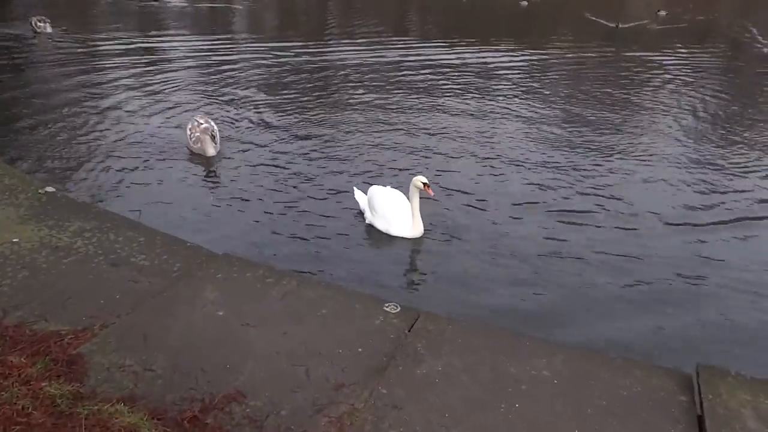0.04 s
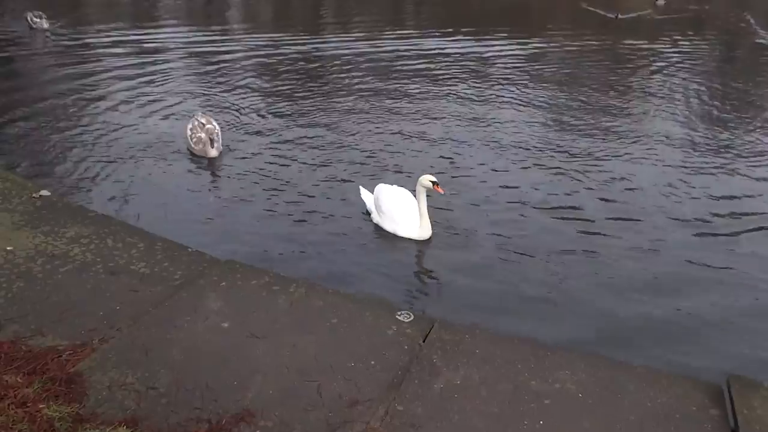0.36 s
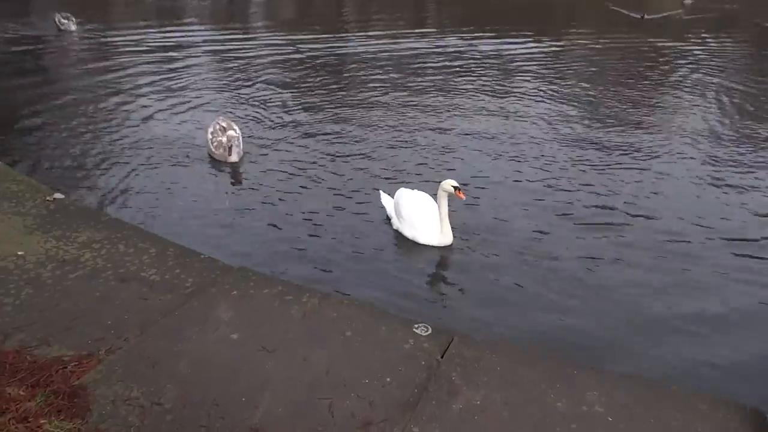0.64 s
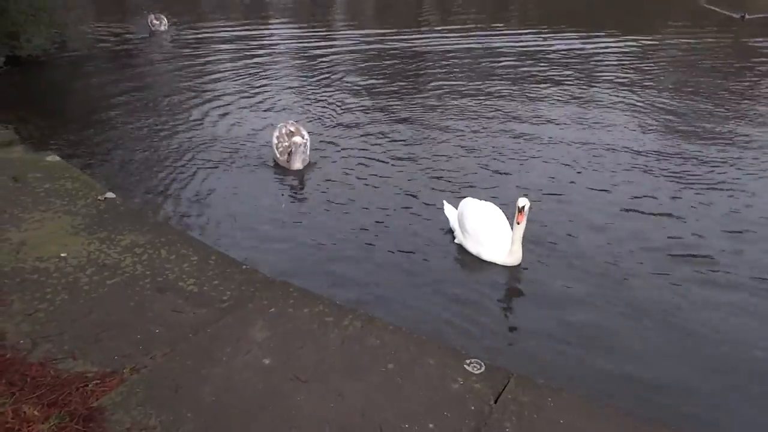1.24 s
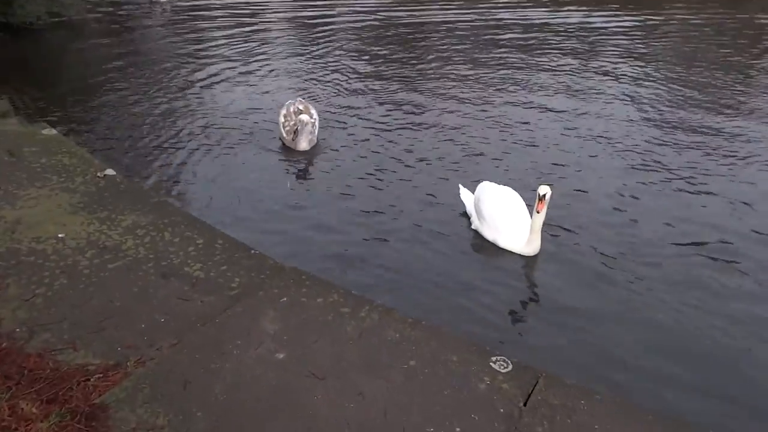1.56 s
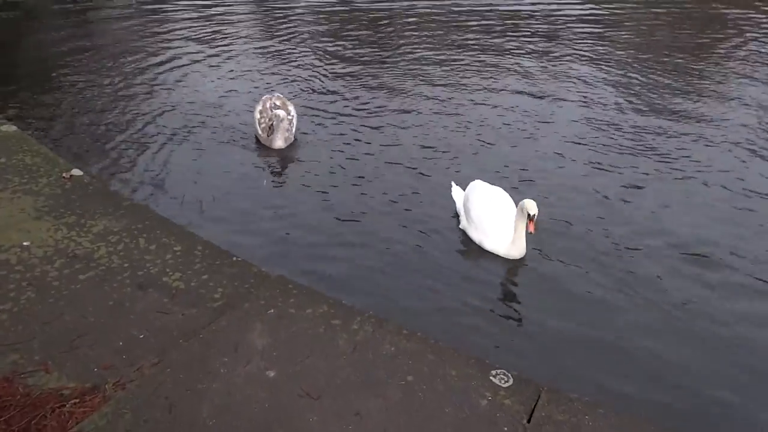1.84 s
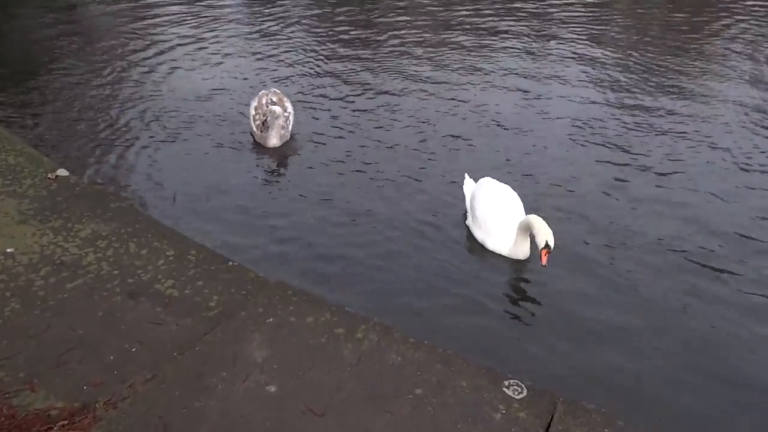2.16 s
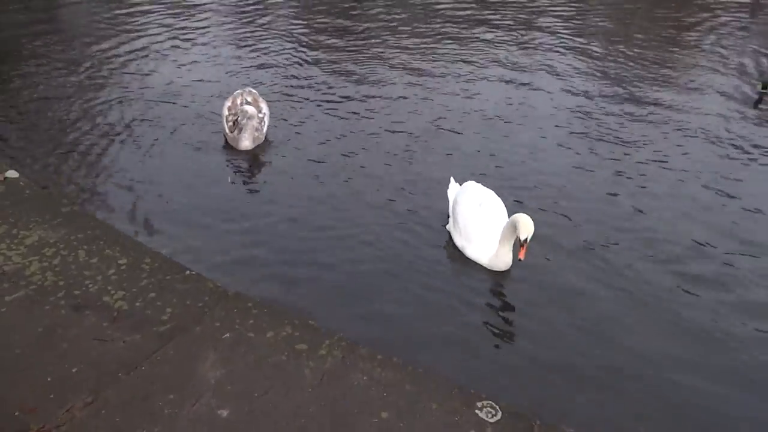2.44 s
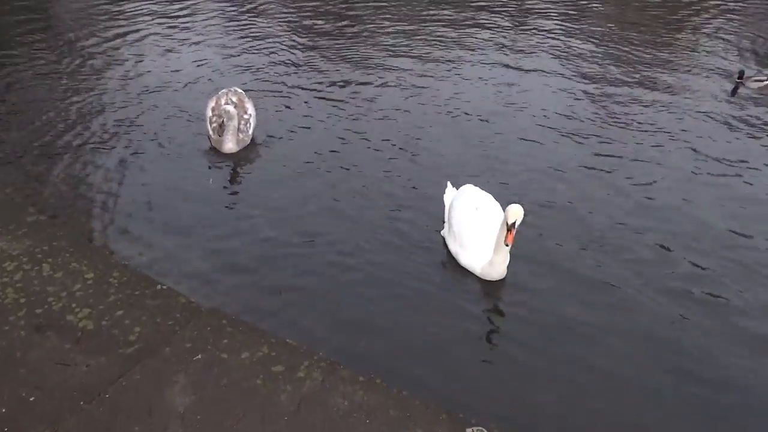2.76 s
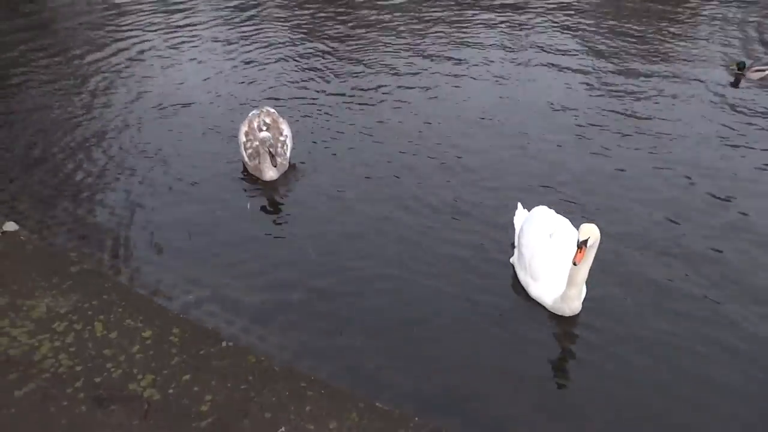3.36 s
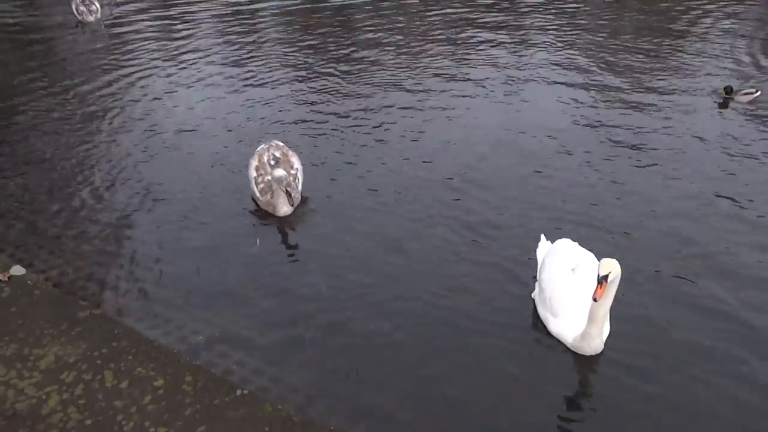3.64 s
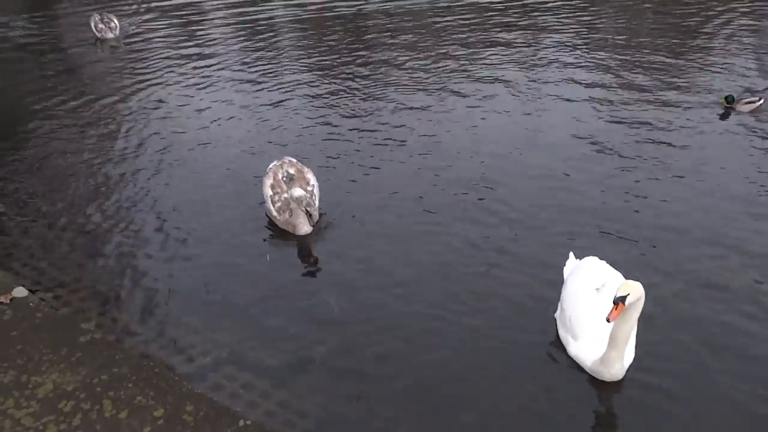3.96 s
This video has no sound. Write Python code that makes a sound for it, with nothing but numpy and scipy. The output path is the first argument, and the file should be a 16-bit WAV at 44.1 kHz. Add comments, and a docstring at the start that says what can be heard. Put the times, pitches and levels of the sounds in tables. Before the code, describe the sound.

Rapid duck-like calls and one drawn-out quack, with faint peeps over a low rumble.

```python
"""A park pond, in stereo. Close to the microphone a water bird chatters in short hoots, eight a second,
draws out one long reedy call, then chatters on. Its voice is a buzz near 300 Hz whose fourth harmonic
rings far above the rest. Farther off come arched whistled peeps, pulsing duck rattles and soft grunts.
The water drips, plops and laps over a low distant rumble, and the banks scatter a faint echo."""
import sys
import numpy as np
from scipy import signal
from scipy.fft import rfft, irfft
from scipy.io import wavfile

SR = 44100
rng = np.random.default_rng(int(sys.argv[2]) if len(sys.argv) > 2 else 0)


def to_wav(s):
    """Save 16-bit WAV."""
    ch = np.atleast_2d(s).T  # columns
    pcm = np.round(np.clip(ch, -1, 1) * 32767)  # PCM
    wavfile.write(sys.argv[1], SR, pcm.astype(np.int16))


N = 176400
T = np.arange(N) / SR

# distant rumble: (frequency [Hz], level [dB])
RUMBLE_SPECTRUM = [(30, -5), (45, -0.5), (70, 4), (280, -10), (1030, -12), (2330, -21.5), (3320, -28),
                   (6600, -35.5), (11000, -40.5)]
# how alike the rumble is left and right: (frequency [Hz], correlation [0-1])
RUMBLE_LIKENESS = [(60, 1), (250, 0.97), (1000, 0.87), (9000, 0.2)]
# the near bird's hoots: (start [s], length [s], level [dB], ring pitch at the middle [Hz], onset [name])
HOOTS = [(.018, 0.065, -14, 1189, "slow"), (.163, 0.029, -17.5, 1188, "soft"),
         (.255, 0.056, -15, 1173, "soft"), (.404, 0.036, -15.5, 1180, "soft"),
         (.518, 0.047, -14, 1182, "hard"), (.655, 0.034, -15.5, 1176, "soft"),
         (.771, 0.04, -12.5, 1186, "hard"), (.893, 0.044, -13, 1172, "hard"),
         (1.032, .022, -13.5, 1179, "soft"), (1.145, 0.033, -11.5, 1178, "hard"),
         (1.272, 0.037, -15.5, 1168, "soft"), (1.402, 0.03, -16.5, 1158, "hard"),
         (1.519, 0.016, -25.5, 1158, "hard"), (2.738, 0.042, -18, 1161, "hard"),
         (2.876, 0.035, -18, 1174, "soft"), (2.987, .034, -18, 1195, "slow"),
         (3.091, .045, -15, 1163, "soft"), (3.228, 0.04, -16, 1161, "hard"),
         (3.351, 0.037, -17, 1141, "soft"), (3.469, 0.042, -17, 1132, "hard"),
         (3.597, .039, -13.5, 1161, "soft"), (3.738, 0.031, -15.5, 1147, "soft"),
         (3.878, .02, -19, 1159, "soft"), (3.982, 0.03, -18.5, 1154, "hard")]
# how fast a hoot opens: (onset [name], attack [s])
HOOT_ATTACK_S = {"hard": .009, "soft": 0.011, "slow": .085}
# faint hums between hoots: (start [s], end [s], level [dB], first ring pitch [Hz], last ring pitch [Hz])
HUMS = [(0.101, 0.164, -39.5, 1246, 1256), (0.193, 0.26, -33, 1141, 1153)]
# throat colour of the hoots, for overtones, rasp and late hoarseness: (frequency [Hz], level [dB])
HOOT_OVERTONES = [(1250, -31.5), (1480, -22), (1780, -35.5), (2080, -39), (2370, -25), (2680, -28.5),
                  (3000, -42), (3600, -58), (6800, -62), (7420, -38.5), (8100, -64)]
HOOT_RASP = [(1000, -14.5), (1400, 5), (1900, 5.5), (2700, -8.5), (3200, -23), (4500, -31.5), (6900, -33.5),
             (7450, -6.5), (8100, -28), (10700, -29)]
HOARSE_RASP = [(2100, -6), (2850, 7.5), (3400, -16), (5000, 9), (5900, -26.5)]
# ducks farther off: (start [s], length [s], level [dB], resonance [Hz])
RATTLES = [(0.346, 0.1, -39, 2290), (0.944, 0.097, -39.5, 2330), (1.199, 0.068, -38.5, 2310),
           (1.482, 0.161, -38, 2210), (1.892, 0.068, -37, 2360), (2.143, 0.038, -36.5, 2170),
           (2.46, 0.11, -39.5, 2210), (2.731, 0.041, -37, 2150), (3.05, 0.099, -38.5, 2150),
           (3.181, 0.016, -40.5, 2790), (3.298, 0.05, -38.5, 2140), (3.618, 0.07, -36.5, 2110),
           (3.719, 0.032, -38.5, 2829), (3.866, 0.051, -37, 2350)]
# a duck's throat: (frequency [multiple of the resonance], level [dB])
RATTLE_THROAT = [(0.4, -29), (0.651, -12.5), (.8, 5.5), (1.05, 5), (1.5, -14), (2.1, -28), (2.7, -17),
                 (3.598, -35.5)]
# far peeps: (time of the top [s], top pitch [Hz], kind [name])
PEEPS = [(0.504, 2616, "short"), (0.626, 2693, "short"), (0.759, 2882, "short"), (.875, 2805, "short"),
         (1.128, 2875, "short"), (1.25, 2775, "short"), (1.382, 2600, "short"), (1.649, 2492, "short"),
         (1.796, 2300, "short"), (2.111, 2370, "short"), (2.25, 2484, "sliding"), (2.38, 2840, "short"),
         (2.656, 2494, "sliding"), (2.795, 2600, "sliding"), (2.931, 2456, "sliding"),
         (3.075, 2357, "short"), (3.225, 2380, "short"), (3.358, 2393, "short"), (3.489, 2645, "sliding"),
         (3.738, 2935, "sliding")]
# kinds of peep, by name: (level before strain [dB], arch depth [Hz], fade [s])
PEEP_KINDS = {"short": (-41, 1400, 0.036), "sliding": (-40.5, 1500, 0.048)}
# far grunts: (middle [s])
GRUNT_TIMES = [.572, .827, 1.326, 1.59, 1.715, 2.452, 2.588, 2.866, 3.006, 3.56, 3.688]
# tiny splashes: (time [s], level [dB])
DRIPS = [(1.505, -38), (1.588, -37)]
# melody of the long call: (time [s], ring pitch [Hz])
LONG_PITCH = [(1.95, 844.6), (1.968, 864), (2.014, 1113), (2.054, 1174), (2.118, 1231), (2.24, 1207),
              (2.3, 1244), (2.368, 1226), (2.376, 1179), (2.5, 1153), (2.53, 1111), (2.615, 1124),
              (2.645, 1166)]
# loudness of the long call: (time [s], ring level [dB], gain of overtones, bray and rasp [dB])
LONG_LEVELS = [(1.944, -70.5, -75), (1.956, -29.5, -48), (1.99, -28.5, -42.5), (2.019, -24, -40),
               (2.12, -16.5, -34.5), (2.135, -20.5, -36.5), (2.22, -21, -36), (2.275, -24.5, -40.5),
               (2.365, -21.5, -34), (2.382, -27, -38), (2.43, -26, -40.5), (2.458, -32, -48.5),
               (2.521, -26.5, -41), (2.56, -41, -63), (2.59, -30.5, -54.5), (2.634, -21, -37),
               (2.659, -28, -57.5), (2.695, -53, -65)]
# throat colour of the long call, for overtones, rasp and opening bray: (frequency [Hz], level [dB])
LONG_OVERTONES = [(1100, 3.5), (1520, 0), (1850, -28), (2450, -19), (3100, -18.5), (3800, -11),
                  (5200, -16.5), (5550, -30), (6700, -27), (7350, -16), (7750, -30), (8100, -45.5)]
LONG_RASP = [(600, -18.5), (1400, 3), (2200, -1.5), (2900, -14.5), (3900, -8), (5100, -5.5), (5600, -21),
             (6700, -19.5), (7450, -2), (8100, -39), (10500, -31)]
BRAY_SPECTRUM = [(1900, 12), (2700, -15), (3350, 5.5), (4500, 2)]
# lapping water: (frequency [Hz], level [dB])
LAP_SPECTRUM = [(80, -29), (170, -6), (450, -6), (6000, -40)]


def from_db(db):
    """Decibels to gain."""
    return 10 ** (np.asarray(db) / 20)


def unit_rms(x):
    """Scale to unit level."""
    return x / np.sqrt(np.mean(x ** 2) + 1e-20)


def at_hz(points, hz):
    """Read a spectrum on a log-frequency axis."""
    freqs, values = np.transpose(points)
    return np.interp(np.log(np.maximum(hz, 1)), np.log(freqs), values)


def noise(spectrum):
    """Coloured noise of unit level."""
    gain = from_db(at_hz(spectrum, np.fft.rfftfreq(N, 1 / SR)))
    return unit_rms(irfft(rfft(rng.standard_normal(N)) * gain, N))


def drift(rate_hz):
    """Random wander of spread 1, mostly slower than rate_hz."""
    rolloff = 1 + (np.fft.rfftfreq(N, 1 / SR) / rate_hz) ** 2
    return unit_rms(irfft(rfft(rng.standard_normal(N)) / rolloff, N))


def phase_of(hz):
    """Running phase of a pitch."""
    return 2 * np.pi * np.cumsum(hz) / SR


def ramp(u):
    """Smooth step from 0 to 1."""
    return np.sin(np.pi / 2 * np.clip(u, 0, 1)) ** 2


def bell(t, width):
    """Smooth swell around t = 0."""
    return np.exp(-np.minimum((t / width) ** 2, 100))


def pan(x, left_db):
    """Place a sound across the microphone; negative is to the right."""
    return x * from_db([[left_db / 2], [-left_db / 2]])


def distant_rumble(rumble_db=-39, drone_hz=50.8, drone_db=-46):
    """Rumble from far off, wider towards the treble, with a wavering low drone in the centre."""
    alike = np.clip(at_hz(RUMBLE_LIKENESS, np.fft.rfftfreq(N, 1 / SR)), 0, 1)
    mid = irfft(rfft(noise(RUMBLE_SPECTRUM)) * np.sqrt((1 + alike) / 2), N)
    side = irfft(rfft(noise(RUMBLE_SPECTRUM)) * np.sqrt((1 - alike) / 2), N)
    drone_gain = np.sqrt(2) * from_db(drone_db + 2 * drift(rate_hz=4))
    drone = drone_gain * np.sin(phase_of(drone_hz * (1 + .03 * drift(rate_hz=13))))
    return from_db(rumble_db) * (mid + side * [[1], [-1]]) + drone


def voice(ring_hz, overtones, rasp_spectrum, jitter, flutter_db=2, colour_db=2, shimmer_db=.7):
    """The near bird's buzz: ringing fourth harmonic, fluttering overtones, rasp puffed once a cycle."""
    ring_hz = ring_hz * (1 + jitter * drift(rate_hz=144))
    phase = phase_of(ring_hz) / 4
    wander_db = flutter_db * drift(rate_hz=90) + colour_db * drift(rate_hz=5.3)
    upper = np.zeros(N)
    for k in range(5, 29):
        db = at_hz(overtones, k * ring_hz / 4) + np.roll(wander_db, rng.integers(N))
        upper += np.sqrt(2) * from_db(db) * np.sin(k * phase + rng.uniform(0, 2 * np.pi))
    ring = np.sqrt(2) * np.sin(4 * phase) * from_db(shimmer_db * drift(rate_hz=33))
    rasp = unit_rms(noise(rasp_spectrum) * (1 + .66 * np.cos(phase)))
    return ring, upper, rasp


def chatter(rasp_db=-20.5, hoarse_db=-35, hoarse_build_s=.95):
    """Close by, each hoot opens, sags in level and pitch, and leaves a faint tail."""
    swell_s, swell_db, tail_s, tail_db = .015, -18.5, .021, -20.5
    release_s, lag_s, sag_db, hum_fade_s = .027, .01, .5, .01
    hz, body, faint = np.full(N, float(HOOTS[0][3])), np.zeros(N), np.zeros(N)
    for start, length, db, pitch, onset in HOOTS:
        span = (T > start - 3 * swell_s) & (T < start + length + 4 * tail_s)
        t = T[span] - start
        progress = np.clip(t / length, 0, 1)
        fall_hz = 96.2 * (1 - length / .064)  # shorter hoots fall farther
        lead_in_hz = 35 * ramp(-t / swell_s)
        tail_drop_hz = 24.15 * ramp((t - length) / tail_s)
        hz[span] = pitch + lead_in_hz + fall_hz * (.5 - progress) - tail_drop_hz
        gate = ramp(.5 + t / HOOT_ATTACK_S[onset]) * ramp((length + lag_s - t) / release_s)
        body[span] += gate * from_db(db - sag_db * (.22 + progress))
        faint[span] += from_db(db + tail_db) * bell(t - length, tail_s)
        if onset == "soft":
            faint[span] += from_db(db + swell_db) * bell(t, swell_s)
    for start, end, db, first_hz, last_hz in HUMS:  # the same voice hums on between hoots
        hum = from_db(db) * ramp((T - start) / hum_fade_s) * ramp((end - T) / hum_fade_s)
        hum_share = hum / (hum + body + 1e-20)
        hz += hum_share * (np.interp(T, [start, end], [first_hz, last_hz]) - hz)
        faint += hum
    ring, upper, rasp = voice(hz, HOOT_OVERTONES, HOOT_RASP, jitter=.003)
    after_long_call = ramp((T - LONG_PITCH[-1][0]) / hoarse_build_s)
    hoarseness = from_db(hoarse_db) * after_long_call * noise(HOARSE_RASP)
    return ring * (body + faint) + body * (upper + from_db(rasp_db) * rasp + hoarseness)


def duck_rattles(pulse_hz=95, decay_s=.0035, pad_s=.011):
    """Farther off, separate throat pulses puff into a broad resonance; each run swells and tapers."""
    out = np.zeros(N)
    for start, length, db, resonance_hz in RATTLES:
        span = (T > start - pad_s) & (T < start + length + pad_s)
        t = T[span] - T[span][0]
        rate = pulse_hz * (1 + .1 * rng.standard_normal())
        since_pulse = (t * rate % 1) / rate
        puffs = np.exp(-since_pulse / decay_s) * rng.choice([-1, 1], len(t))
        throat = [(ratio * resonance_hz, level) for ratio, level in RATTLE_THROAT]
        gain = from_db(at_hz(throat, np.fft.rfftfreq(len(t), 1 / SR)))
        rattle = irfft(rfft(puffs) * gain, len(t))
        out[span] += from_db(db) * unit_rms(rattle * np.sin(np.pi * t / t[-1]))
    return out


def peeps(half_depth_s=.047, lag_s=.0031, octave_db=-17, strain_db=-2, flutter_db=3):
    """Far whistles arch up and down with a weak octave; the higher ones are strained and blurred."""
    out, waver = np.zeros(N), .03 * drift(rate_hz=400)
    tops = [top_hz for _, top_hz, _ in PEEPS]
    for time, top_hz, kind in PEEPS:
        db, depth_hz, fade_s = PEEP_KINDS[kind]
        span = abs(T - time) < 2 * fade_s
        t = T[span] - time
        strain = (top_hz - min(tops)) / np.ptp(tops)
        arch_hz = top_hz - depth_hz * t ** 2 / (t ** 2 + half_depth_s ** 2)
        phase = phase_of(arch_hz * (1 + (.5 + strain) * waver[span]))
        swell = from_db(db + strain_db * strain) * bell(t - lag_s, fade_s)  # loudest just after the top
        out[span] += np.sqrt(2) * swell * (np.sin(phase) + from_db(octave_db) * np.sin(2 * phase))
    return out * from_db(flutter_db * drift(rate_hz=110))


def grunts(hz=830, fall_hz_per_s=2800, width_s=.014, db=-37.5):
    """Short, soft, falling notes from farther off, roughened by a wavering pitch."""
    out, waver = np.zeros(N), 1 + .026 * drift(rate_hz=140)
    for time in GRUNT_TIMES:
        span = abs(T - time) < np.pi * width_s
        t = T[span] - time
        phase = phase_of((hz - fall_hz_per_s * t) * waver[span])
        out[span] += np.sqrt(2) * from_db(db) * bell(t, width_s) * np.sin(phase)
    return out


def drips(decay_s=.0022):
    """Tiny splashes out on the pond, each a tick of noise that dies at once."""
    envelope = np.zeros(N)
    for time, db in DRIPS:
        envelope += from_db(db) * (T > time) * np.exp(-np.minimum(abs(T - time) / decay_s, 20))
    return envelope * rng.standard_normal(N)


def plop(time_s=1.735, hz=569, width_s=.011, db=-32.5):
    """One plop in the water: a brief pure note."""
    return np.sqrt(2) * from_db(db) * bell(T - time_s, width_s) * np.sin(2 * np.pi * hz * T)


def long_call(bray_end_s=2.08, rasp_db=-7.5, slack_db=12.5, dull_s=2.32, dull_db=-16):
    """The near voice held: it brays as it slides up, stays reedy, then sinks, dulls and roughens."""
    times, ring_db, upper_db = np.transpose(LONG_LEVELS)
    hz = np.interp(T, *np.transpose(LONG_PITCH))
    ring, upper, rasp = voice(hz, LONG_OVERTONES, LONG_RASP, jitter=.0018)
    bray_phase = phase_of(hz * (1 + .0063 * drift(rate_hz=220)))
    bray_gate = ramp((bray_end_s - T) / .05)
    for k, share in ((2, .5), (3, 1), (4, .5)):  # the ring brays at its own multiples
        upper += bray_gate * share * from_db(at_hz(BRAY_SPECTRUM, k * hz)) * np.sin(k * bray_phase)
    slack = ramp(10 * (1 - hz / hz.max()))  # rougher where the pitch is slack
    upper += from_db(rasp_db + slack_db * slack) * rasp
    treble = signal.sosfilt(signal.butter(1, [3670, 6000], "band", fs=SR, output="sos"), upper)
    upper -= (1 - from_db(dull_db)) * ramp((T - dull_s) / .045) * treble
    ring *= from_db(np.interp(T, times, ring_db))
    upper *= from_db(np.interp(T, times, upper_db))
    return (ring + upper) * (T > times[0]) * (T < times[-1])


def lap(time_s=3.8, width_s=.1, db=-39):
    """The water laps once, a low wash of noise."""
    return from_db(db) * bell(T - time_s, width_s) * noise(LAP_SPECTRUM)


def bank_echo(x, t60_s=.3):
    """Scatter from the banks, reaching each side of the microphone differently."""
    t = T[:SR // 2]
    tails = rng.standard_normal((2, len(t))) * from_db(-60 * t / t60_s)
    return np.array([signal.fftconvolve(x, tail / np.linalg.norm(tail))[:N] for tail in tails])


def scene():
    """The near bird almost dry, just right of centre; the rest farther right, with more echo."""
    near = chatter() + long_call()
    far = duck_rattles() + grunts() + drips() + plop() + lap()
    whistles = peeps()
    echo = bank_echo(from_db(-34) * near + from_db(-16.5) * far + from_db(-8.5) * whistles)
    return pan(near, left_db=-1.35) + pan(far + whistles, left_db=-2.5) + echo + distant_rumble()


def record(dry):
    """The microphone's signal, cut steeply at the top."""
    cutoff_hz = 11250
    return signal.sosfilt(signal.ellip(12, .1, 80, cutoff_hz, fs=SR, output="sos"), dry)


dry = scene()
out = record(dry)
to_wav(out)
```